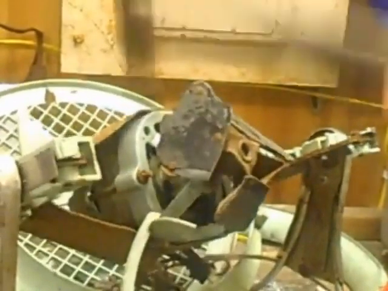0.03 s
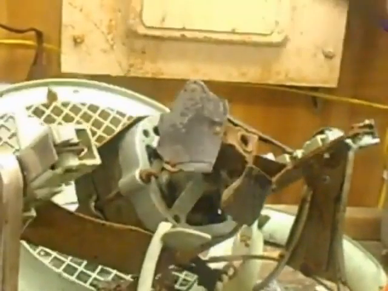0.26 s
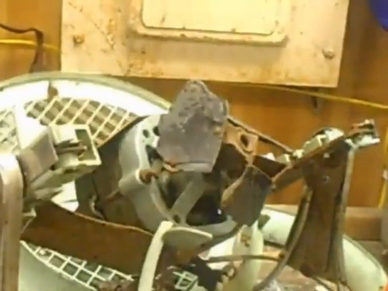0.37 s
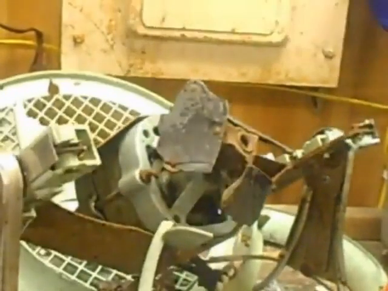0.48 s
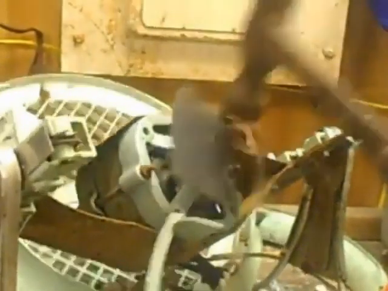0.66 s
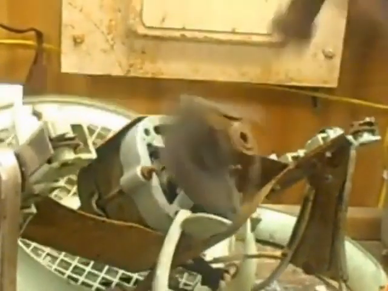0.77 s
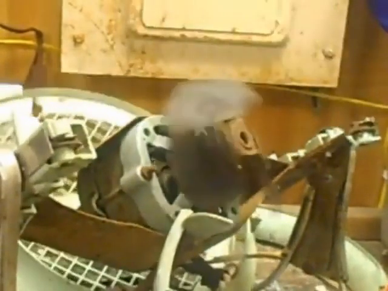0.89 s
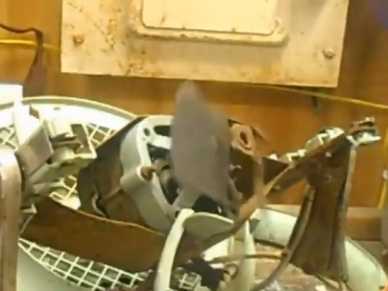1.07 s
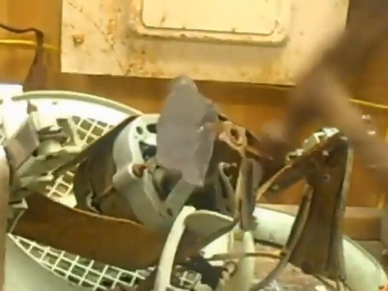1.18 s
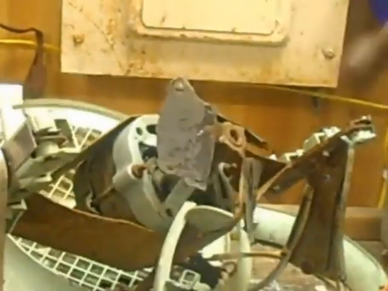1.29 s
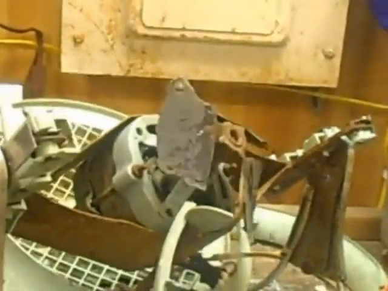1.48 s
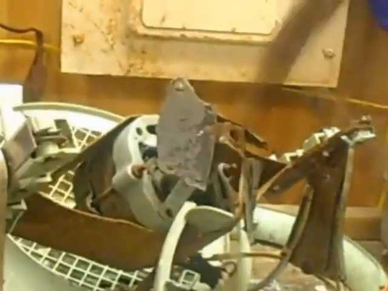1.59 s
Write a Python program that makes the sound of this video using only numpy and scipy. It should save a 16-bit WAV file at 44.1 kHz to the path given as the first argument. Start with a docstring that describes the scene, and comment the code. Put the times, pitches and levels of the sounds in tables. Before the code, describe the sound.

Three sharp hammer blows crash on an old metal fan, with slight rattling.

```python
"""A low machine hum fills a workshop. At 0.2 s a hammer hits the motor frame of an old metal fan:
the sheet metal crashes, the bench booms, a thin ring lingers and the wire guard rattles. More blows land
at 0.8 s and 1.3 s, and after each of these, loose parts bounce. The blows overload the nearby microphone.
Background hiss swells before each blow and drops away, then rises again at the end."""
import sys
import numpy as np
from scipy import signal
from scipy.fft import irfft, next_fast_len
from scipy.io import wavfile

SR = 44100
rng = np.random.default_rng(int(sys.argv[2]) if len(sys.argv) > 2 else 0)


def generate_wav(signal):
    """Clip the signal to [-1, 1] and save it as 16-bit WAV at the path in sys.argv[1]."""
    frames = np.transpose(np.atleast_2d(signal))
    scaled = np.clip(frames, -1, 1) * 32767
    pcm = np.round(scaled).astype(np.int16)
    wavfile.write(sys.argv[1], SR, pcm)


N = 72765
T = np.arange(N) / SR

# Hammer blows. A "fade" is the time a sound takes to drop by 60 dB.
# (time [s], crash level [dB], hold [s], crash fade at 3 kHz [s], treble tilt [dB per octave],
# boom level [dB], boom hold [s], thump level [dB], thump pitch [Hz])
BLOWS = [(.2112, 0, 0.019, 0.14, -0.65, -9, 0.026, -12.5, 74.7),
         (0.7763, -3, 0.0038, 0.13, 3, -14.5, 0.056, -4, 68),
         (1.2774, -4.5, 0.012, 0.18, 0.3, -19.5, .085, -6.5, 67.3)]
# Tone colour of the crashing sheet metal (frequency [Hz], level [dB])
CRASH_COLOUR = [(200, 0.5), (450, -6), (750, -2), (1050, 0.5), (1400, -3.5), (2400, 1), (3600, 1.5),
                (5200, -0.5), (7200, -2), (10500, -5)]
# The fan's own notes; each blow lands on a new spot and brings out a different mix
# (pitch [Hz], fade [s], level at blow 1 [dB], level at blow 2 [dB], level at blow 3 [dB])
FAN_NOTES = [(1228, 0.098, -11.5, -12, -34), (1380, 0.13, -11.5, -22, -23), (1552, 0.077, -44, -4.5, -47),
             (2095, 0.07, -7.5, -29, -27), (2308, 0.24, -12, -40, -25.5), (2380, 0.16, -10, -25, -15),
             (2534, 0.081, -14, -30, -34), (2730, 0.07, -28, -9, -42), (3260, 0.062, -6.5, -10.5, -11),
             (3442, 0.097, -24, -28, -8.5), (3576, 0.17, -18.5, -31, -12.5), (3720, 0.15, -22, -21, -23),
             (3950, 0.068, -33, -8.5, -29), (4400, 0.14, -17, -15, -26), (5044, 0.036, -14, -9.5, -34),
             (5290, 0.43, -26.5, -38, -15.5), (5565, 0.062, -22, -3.5, -28), (5995, 0.049, -34, -18, -12),
             (6834, .07, -10, -19, -11.5), (7190, 0.03, -8, -8, -24)]
# Tone colour of the booming bench (frequency [Hz], level [dB])
BENCH_COLOUR = [(30, -3), (70, -11.5), (120, 3), (170, -0.5), (240, -8.5), (390, -7.5), (600, -17),
                (1500, -42)]
# Loose parts landing (time [s], clank level [dB], clank fade [s], knock level [dB])
BOUNCES = [(0.82, -19.5, 0.23, -30), (0.8597, -15, 0.069, -15), (0.878, -27, .16, -30),
           (1.0716, -36, 0.25, -38), (1.338, -38, 0.27, -35), (1.385, -24, 0.089, -39),
           (1.443, -34.5, 0.11, -31)]
# Tone colour of their clank (frequency [Hz], level [dB])
CLANK_COLOUR = [(200, 2.5), (700, 2), (1300, 3.5), (1900, -3), (2250, 0), (2570, 6.5), (2900, -4.5),
                (5000, -9.5), (10000, -30.5)]
# Small ticks of the wire guard (time [s], level [dB])
RATTLES = [(.392, -39), (0.4393, -38.5), (.491, -39.5), (0.5414, -33), (0.6037, -36.5), (0.625, -28),
           (0.6443, -25.5), (0.677, -31.5), (0.693, -29.5), (0.7096, -30), (0.724, -27), (1.072, -38.5),
           (1.122, -48), (1.174, -33), (1.215, -29.5), (1.511, -38)]
# Tone colour of those ticks (frequency [Hz], level [dB])
TICK_COLOUR = [(500, -4), (1500, -17), (2700, 2), (4200, -2), (6500, -1), (8000, -1.5), (10500, 3.5)]
# Pitches of the high buzz in the ticks and the hiss (pitch [Hz], width [Hz], level [dB])
BUZZ_PEAKS = [(2610, 420, 0), (3800, 190, 0), (4220, 220, -3.5), (4920, 610, -3), (5750, 120, -7),
              (7170, 200, -5.5), (7850, 550, 0.5), (9300, 980, -5)]
# Swells of the background hiss (time of the peak [s], level [dB], rise [dB per s], fall [dB per s])
BACKGROUND_SWELLS = [(0.159, -45, 18, 218), (0.718, -29.5, 67, 196), (1.242, -29.5, 69.5, 136),
                     (1.68, -36, 42.5, 130)]
# Tone colour of that hiss (frequency [Hz], level [dB])
HISS_COLOUR = [(150, -5), (280, -8.5), (400, 4.5), (800, -3.5), (1300, -2.5), (2000, -11.5), (4500, -11.5),
               (7000, -17.5), (10000, -24)]
# Tone colour of the workshop's echo (frequency [Hz], level [dB])
ECHO_COLOUR = [(100, -0.5), (500, 2.5), (1300, 0), (3000, -10.5), (10000, -10.5)]
# Notes of the machine hum (pitch [Hz], level before the swell [dB], waver [dB])
HUM_NOTES = [(67.3, -36.5, 3), (132.5, -34, 1.5)]
# Slow swell of that hum (time [s], level change [dB])
HUM_SWELL = [(0, -6.5), (.2, -7), (.45, -1), (.75, 4), (1.0, -2), (1.15, -0.5), (1.65, -2)]
# Tone colour of the steady room noise (frequency [Hz], level [dB])
AIR_COLOUR = [(15, 0.5), (40, -3), (150, -6.5), (274, -19), (425, -20), (800, -27), (1500, -32),
              (3000, -47), (6500, -62.5), (10000, -57.5)]


def sheet_crash():
    """The sheet metal chatters at countless pitches while the hammer presses, then fades, treble first."""
    edges = np.geomspace(180, SR / 4, 15)
    centres = np.sqrt(edges[:-1] * edges[1:])
    bands = [shaped_noise(lambda hz: (hz >= lo) & (hz < hi)) for lo, hi in zip(edges[:-1], edges[1:])]
    octaves = np.log2(centres / 3000)
    damping, flicker_db = 0.24, 1.5
    out = np.zeros(N)
    for start, db, hold, fade, tilt, *_ in BLOWS:
        gains = from_db(colour_db(CRASH_COLOUR, centres) + tilt * octaves) * np.sqrt(np.diff(edges))
        gains = from_db(db) * gains / np.linalg.norm(gains)
        for band, gain, octave in zip(bands, gains, octaves):
            out += gain * band * envelope(start, 0, hold, fade * 2 ** (-damping * octave))
    return out * from_db(flicker_db * wander(154))


def fan_ring():
    """The fan's stiff parts sound while the hammer presses on them, then ring on."""
    out = np.zeros(N)
    for hz, fade, *spot_levels in FAN_NOTES:
        wobble = 0.087 / fade * wander(93)  # the bent sheet makes short notes the least steady
        tone = np.sin(2 * np.pi * hz * T + wobble)
        for (start, _, hold, *_), db in zip(BLOWS, spot_levels):
            out += from_db(db) * tone * envelope(start, 0, hold, fade)
    return out


def bench_boom():
    """The fan rocks on the bench: a deep thump inside a dull boom, both slower than the crash."""
    out, boards = np.zeros(N), noise(BENCH_COLOUR)
    for start, *_, boom_db, boom_hold, thump_db, thump_hz in BLOWS:
        out += from_db(boom_db) * boards * envelope(start, rise_s=0.0049, hold_s=boom_hold, fade_s=0.24)
        sway = -np.sin(2 * np.pi * thump_hz * (T - start))
        out += from_db(thump_db) * sway * envelope(start, rise_s=0.022, hold_s=0.025, fade_s=0.32)
    return out


def loose_parts():
    """Loose parts drop back with a clank of metal and a knock on the bench."""
    clank, knock = np.zeros(N), np.zeros(N)
    for start, clank_db, fade, knock_db in BOUNCES:
        clank += from_db(clank_db) * envelope(start, 0, 0, fade)
        knock += from_db(knock_db) * envelope(start, rise_s=0.0017, hold_s=0, fade_s=0.24)
    return clank * noise(CLANK_COLOUR) + knock * noise(BENCH_COLOUR)


def guard_rattle():
    """The guard ticks as the fan settles, and every tick keeps a thin ring going."""
    shake = sum(from_db(db) * envelope(start, rise_s=0.0017, hold_s=0.0017, fade_s=0.045)
                for start, db in RATTLES)
    ticks = normalise(noise(TICK_COLOUR) + 0.94 * high_buzz()) * shake
    ring_hz = 5268
    thin_ring = envelope(0, 0, 0, fade_s=0.28) * np.sin(2 * np.pi * ring_hz * T)
    return ticks + ring_out(ticks, thin_ring, db=-17)


def high_buzz():
    """A whining buzz: noise gathered around a few high pitches."""
    return shaped_noise(
        lambda hz: sum(from_db(db) * peak(hz, centre, width) for centre, width, db in BUZZ_PEAKS))


def background_swells():
    """Background hiss, with a faint high whine and buzz, swells before each blow and at the end."""
    swell = sum(from_db(db - rise * np.maximum(at - T, 0) - fall * np.maximum(T - at, 0))
                for at, db, rise, fall in BACKGROUND_SWELLS)
    hiss = noise(HISS_COLOUR) + from_db(-10) * high_buzz()
    flicker = from_db(1.5 * wander(90))
    return swell * hiss * flicker


def room_echo(sound):
    """The cluttered room throws the sound back as a short, dull tail."""
    tail = noise(ECHO_COLOUR) * envelope(0, rise_s=0.023, hold_s=0, fade_s=0.42)
    return ring_out(sound, tail, db=-28)


def workshop_hum():
    """A machine hums unsteadily over a faint, high whine and dull room noise."""
    hum = np.zeros(N)
    for hz, db, waver_db in HUM_NOTES:
        level = from_db(db + waver_db * wander(2.8))
        hum += level * np.sqrt(2) * np.sin(2 * np.pi * hz * T + 0.5 * wander(3.6))
    swell = from_db(np.interp(T, *np.array(HUM_SWELL).T))
    whine = shaped_noise(lambda hz: peak(hz, centre_hz=7840, width_hz=100))
    return hum * swell + from_db(-60.5) * whine + from_db(-31) * noise(AIR_COLOUR)


def from_db(db):
    """Turn decibels into a number to multiply by."""
    return 10 ** (np.asarray(db) / 20)


def normalise(sound):
    """Scale a sound so that its average strength (rms) is 1."""
    return sound / np.sqrt(np.mean(sound ** 2) + 1e-18)


def colour_db(colour, hz):
    """Read the level at any frequency from a tone colour table."""
    frequencies, levels = np.array(colour, float).T
    return np.interp(np.log(np.maximum(hz, 1)), np.log(frequencies), levels)


def peak(hz, centre_hz, width_hz):
    """A hill of height 1 around one frequency."""
    return 1 / (1 + (2 * (hz - centre_hz) / width_hz) ** 2)


def shaped_noise(gain):
    """Noise of strength 1; gain(hz) says how much of each frequency it holds."""
    size = next_fast_len(N)
    hz = np.arange(size // 2 + 1) * SR / size
    phases = np.exp(2j * np.pi * rng.random(len(hz)))
    return normalise(irfft(gain(hz) * phases, size)[:N])


def noise(colour):
    """Noise with the given tone colour and nothing above about 11 kHz."""
    return shaped_noise(lambda hz: from_db(colour_db(colour, hz)) * (hz < SR / 4))


def wander(rate_hz):
    """A smooth random wiggle; a higher rate makes it quicker."""
    return shaped_noise(lambda hz: 1 / (1 + (hz / rate_hz) ** 4))


def envelope(start_s, rise_s, hold_s, fade_s):
    """Loudness over time: it rises from the start and begins to fade hold_s after the start."""
    age = T - start_s
    rise = np.clip(age / max(rise_s, 1 / SR), 0, 1)
    return rise * np.exp(-np.log(1000) * np.maximum(age - hold_s, 0) / fade_s)


def ring_out(sound, tail, db):
    """Let every instant of a sound set off its own copy of the tail."""
    return from_db(db) * signal.fftconvolve(sound, tail / np.linalg.norm(tail))[:N]


def cut_treble(sound, top_hz=10680):
    """Steeply remove everything above top_hz."""
    taps = signal.firwin(221, top_hz, window=("kaiser", 8), fs=SR)
    return signal.fftconvolve(sound, taps[None], mode="same")


def scene():
    """Mix the struck fan, its echo, the swelling hiss and the hum into one channel."""
    fan = sheet_crash() + fan_ring() + bench_boom() + loose_parts() + guard_rattle()
    return (fan + room_echo(fan) + background_swells() + workshop_hum())[None]


def record(dry):
    """The overloaded microphone squashes the peaks; the top treble is cut and any overshoot clipped."""
    overload, sharpness, ceiling = 0.76, 4.6, 0.8
    squashed = dry / (1 + np.abs(dry / overload) ** sharpness) ** (1 / sharpness)
    clipped = np.clip(cut_treble(squashed), -ceiling, ceiling)
    return cut_treble(clipped)


dry = scene()
out = record(dry)
generate_wav(out)
```